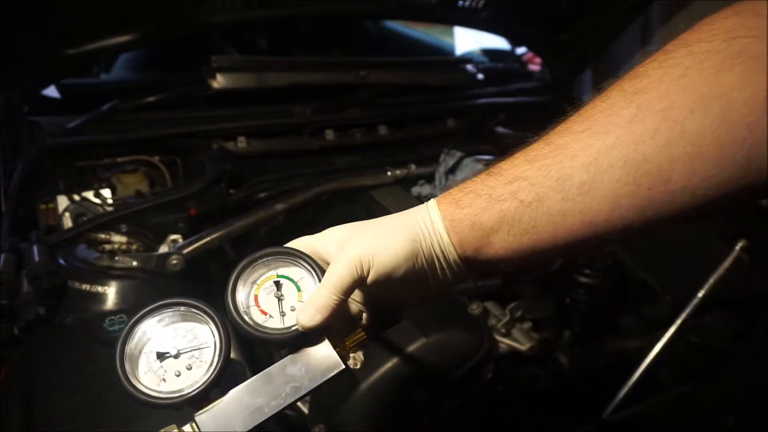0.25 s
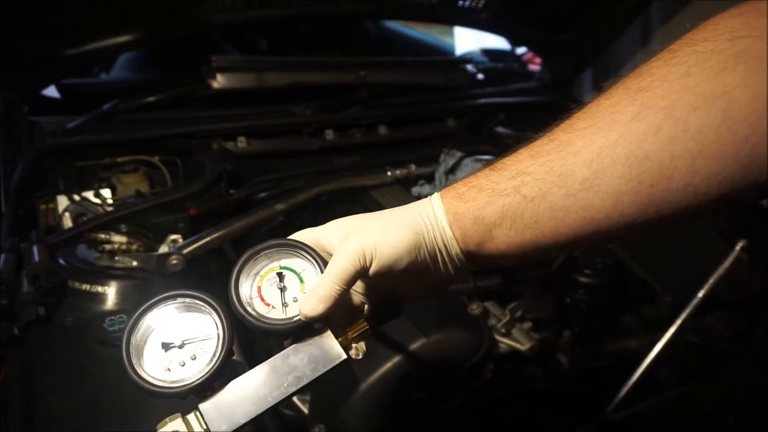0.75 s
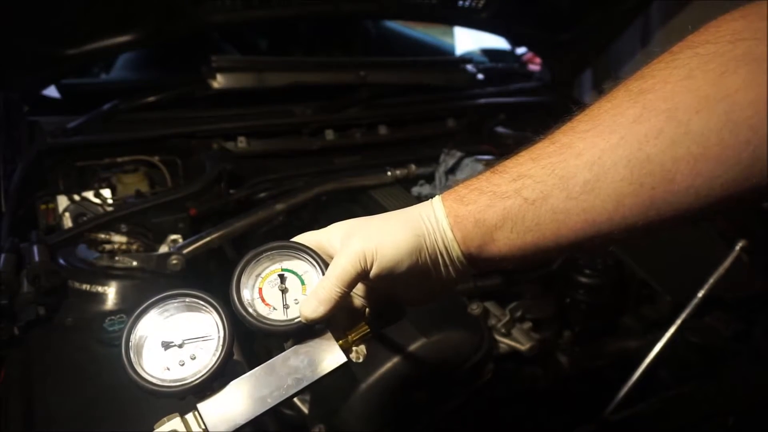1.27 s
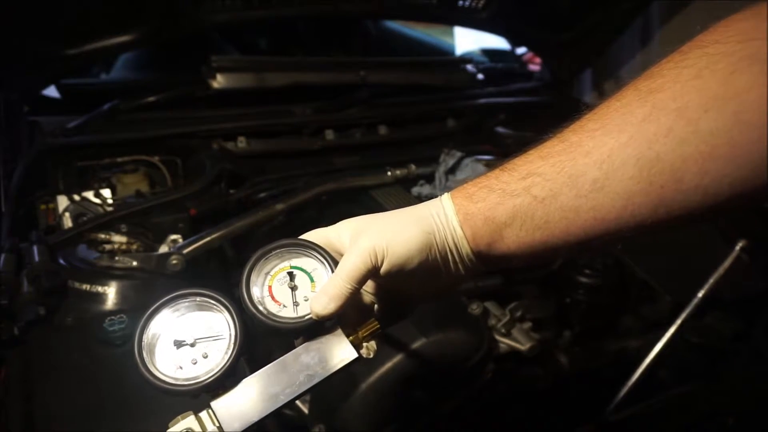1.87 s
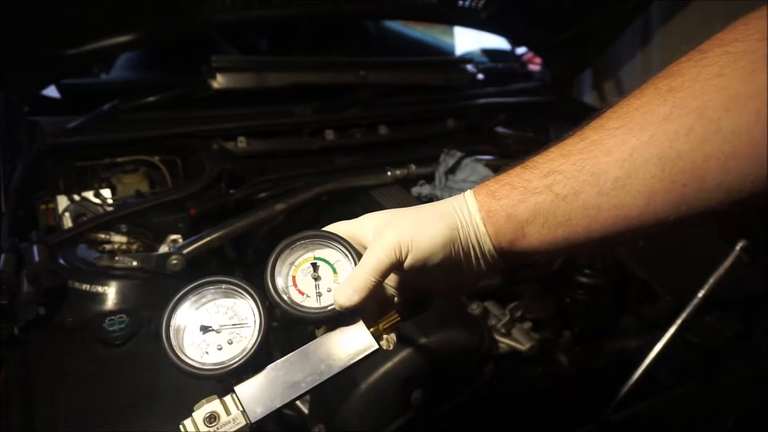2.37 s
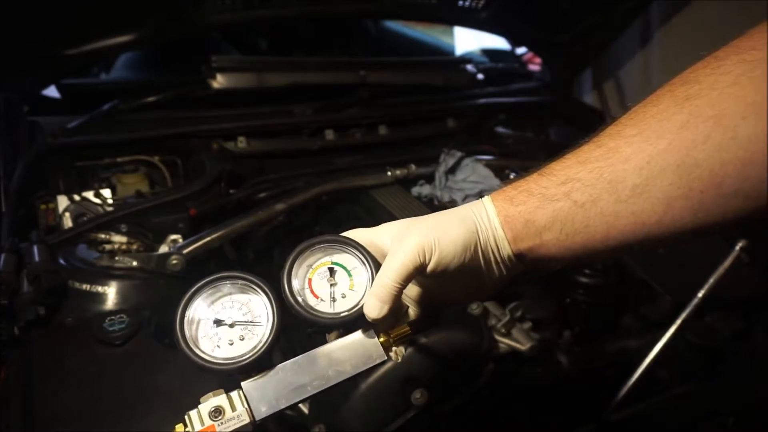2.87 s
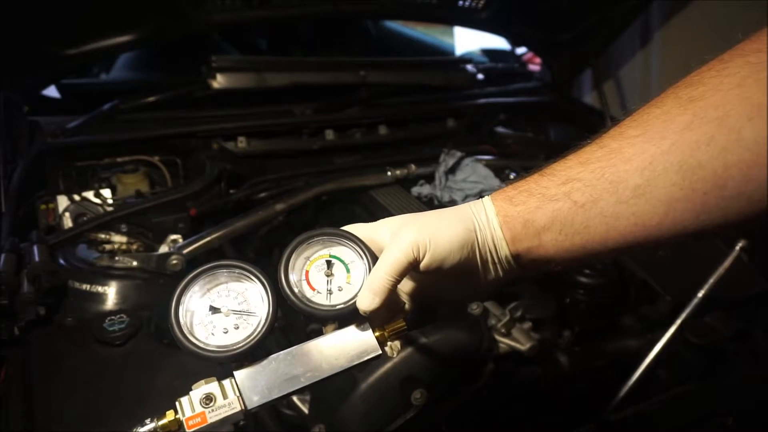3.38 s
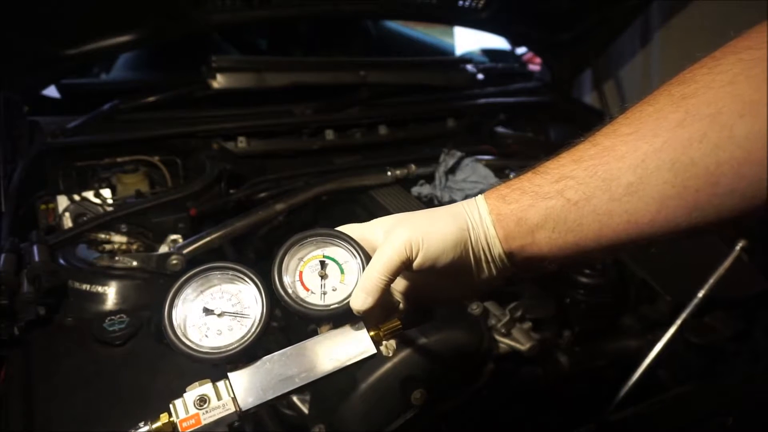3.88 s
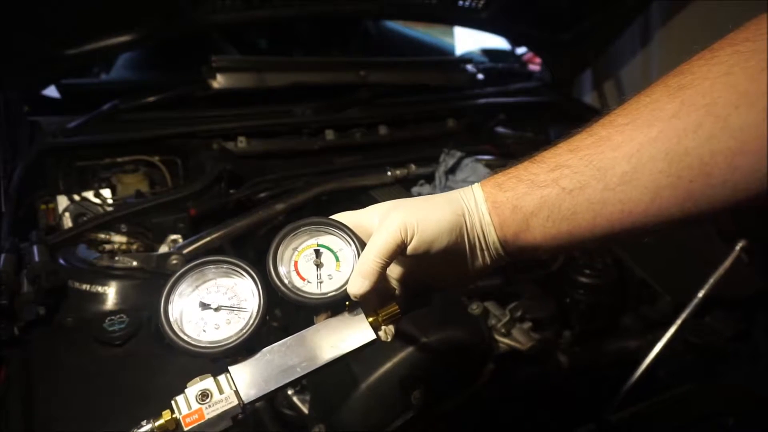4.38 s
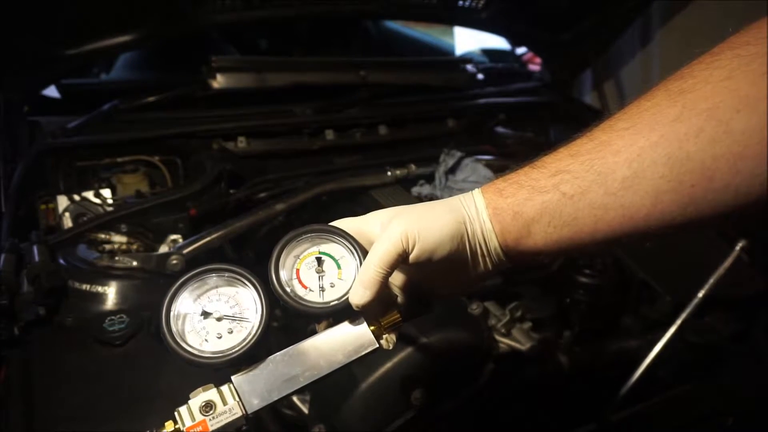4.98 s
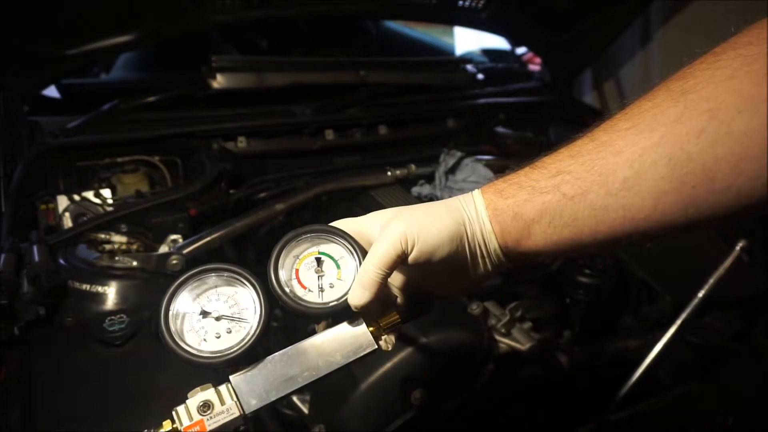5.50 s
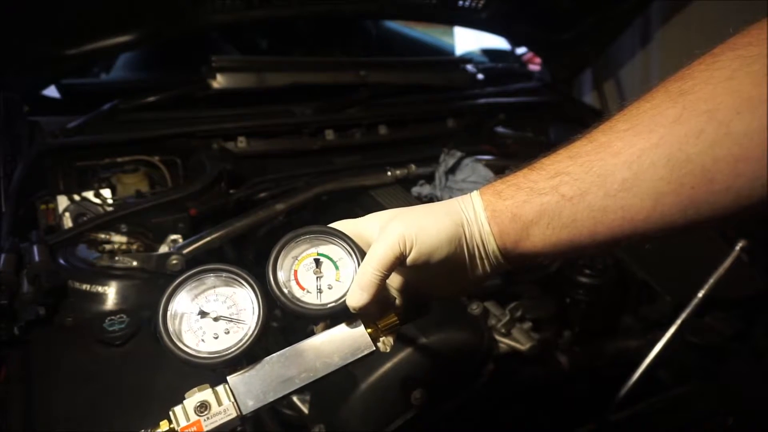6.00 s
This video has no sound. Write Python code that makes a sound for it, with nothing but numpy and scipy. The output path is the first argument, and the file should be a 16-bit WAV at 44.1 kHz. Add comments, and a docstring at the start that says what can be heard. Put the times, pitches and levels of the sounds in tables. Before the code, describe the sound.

From 0 to about 6 seconds an electric piston air compressor runs without pause, close up in a garage. About forty-seven strokes a second merge into a coarse, steady buzz, dominated by a hum near 380 hertz with a harder knock around 1.3 kilohertz. The speed sinks by a hair. Bright, dry valve ticks repeat every turn, with a tinny housing rattle and unsteady singing panels. Air roars in pulses and hisses broadly, slightly uneven, wide across left and right. Rattling is strongest near 0.2 with a ringing note around 3 kilohertz, swells again near 2.1, 3.55 and 4.1, and otherwise slowly settles. A thin whistle near 5.3 kilohertz flickers throughout, stronger at left, with brief flares near 0.8, 2.0, 3.7, 4.3, 4.8 and a cluster at 5.1 to 5.4, then again near 6.1. It is still running at the end.

```python
"""An electric piston air compressor runs in a garage, its crank slowing very slightly as pressure builds.
Sums of crank harmonics give the pump's throb and the cylinder's knock in each turn, and the singing panels.
Noise patterns repeating with the crank make the rattle, and decaying tones the ticks of the reed valves.
Shaped noise and narrow resonances make the rush of air; a thin whistle flickers and flares now and then."""
import sys
import numpy as np
from scipy import signal
from scipy.fft import rfft, irfft, next_fast_len
from scipy.io import wavfile
from scipy.ndimage import uniform_filter1d, map_coordinates

SR = 44100
rng = np.random.default_rng(int(sys.argv[2]) if len(sys.argv) > 2 else 0)


def to_wav(sig):
    """Store sig (one row per channel, or 1-D mono) as 16-bit WAV at the path in sys.argv[1].

    Samples outside -1..1 are clipped; the rate is SR.
    """
    pcm = np.clip(np.atleast_2d(sig), -1, 1) * 32767
    pcm = np.round(pcm).astype(np.int16)
    wavfile.write(sys.argv[1], SR, pcm.T)  # frames by channels


N = 275625  # samples

# Crank harmonics of the throb, of the knock and of the singing panels, with nominal levels:
# [multiple of crank speed, level/dB rms, left-right level/dB, left-right phase/half cycles]
THROB_HARMONICS = [(1, -36.7, 1, 0.04), (2, -31.4, 0, 0.04), (3, -42.8, 0, 0.09), (4, -37.5, 1, 0.07),
                   (5, -41.6, 0, 0.12), (6, -38.9, -1, 0.09), (7, -31.4, 1, 0.17), (8, -19.6, 1, 0.19),
                   (9, -42.8, 3, 0.13), (10, -36.7, -3, 0.4), (11, -39.7, 3, 0.24), (12, -58.2, 7, 0.62),
                   (13, -49.0, 1, 0.13), (14, -34.6, 1, 0.28), (15, -41.9, 13, 0.43), (16, -49.3, 4, 0.16),
                   (17, -41.3, 3, 0.25), (18, -29.3, -4, 0.05), (19, -36.7, 9, 0.74), (20, -41.8, 8, 0.13),
                   (21, -43.3, -4, 0.05), (22, -46.6, -1, 0.06)]
KNOCK_HARMONICS = [(25, -50.1, -1, 0.19), (26, -46.3, 2, 0.21), (27, -30.4, 1, 0.18), (28, -28.7, -3, 0.37),
                   (29, -31.2, -3, 0.06), (30, -37.9, -3, 0.49), (31, -41.2, 0, 0.51), (32, -41.6, 1, 0.64),
                   (33, -33.3, 5, 0.54), (34, -40.8, -9, 0.83), (35, -45.7, 0, 0.36), (36, -44.6, -1, 0.38)]
PANEL_HARMONICS = [(39, -45.3, -8, 0.65), (40, -48.0, 2, 0.5), (43, -47.1, -1, 0.57), (44, -43.6, 3, 0.63),
                   (45, -47.5, 5, 0.46), (57, -42.9, 4, 0.7), (64, -51.4, 3, 0.3), (65, -44.8, -1, 0.29),
                   (70, -41.0, -5, 0.87), (71, -46.7, 1, 0.77), (74, -45.7, 4, 0.56), (75, -45.5, 5, 0.64),
                   (77, -46.9, -5, 0.53), (79, -49.0, -5, 0.23), (85, -51.6, 2, 0.3), (105, -51.8, 6, 0.16)]
# Reed contacts in each turn: [crank position/turns, f/Hz, decay time/ms, nominal level/dB]
VALVE_CONTACTS = [(0.84, 15200, 1.04, -14.5), (.96, 15000, 1.6, -20), (.9, 13000, 1.6, -27.5),
                  (0.894, 9350, 4.6, -30), (0.073, 9200, 4.3, -32)]
# Loudest flares of the whistle: [t/s, nominal level/dB]
LOUD_FLARES = [(.452, -30), (.834, -24.5), (.906, -27), (1.306, -30), (1.981, -25), (3.694, -25),
               (4.304, -27), (4.775, -27), (5.096, -28), (5.231, -27), (5.428, -23.5), (6.147, -26)]
# Relative spectra of the roar, the hiss and the rattle: [f/Hz, density/dB per Hz]
ROAR_SPECTRUM = [(27, -6), (60, -7), (270, -8.5), (350, 1), (440, -4.5), (520, -2), (580, -12), (780, -12),
                 (880, -5.5), (980, -5), (1140, -10.5), (1350, 3.5), (1600, -6.5), (1900, -12.5)]
HISS_SPECTRUM = [(1900, -5), (2350, -4), (3400, -1), (4600, -2.5), (5700, -5), (6400, -3), (7500, -7.5),
                 (10500, -8), (12500, -7), (14000, -9), (15700, -3.5)]
RATTLE_SPECTRUM = [(1750, -4.5), (2400, -4.5), (3400, -4), (4300, -12), (5500, -2), (6400, -25),
                   (7600, -15), (8800, -8.5), (9300, 1), (10000, -19), (11000, -29)]
# Likeness of the two channels: [f/Hz, correlation]
CHANNEL_CORRELATION = [(100, .2), (350, 0.21), (620, 0.18), (850, 0.68), (1350, 0.29), (2000, 0.044),
                       (3400, -0.17), (6400, -0.44), (9000, -0.31), (13000, 0.13)]
# Narrow resonances of the tank and pipes, stirred by the air: [f/Hz, width/Hz, level/dB rms]
PIPE_RESONANCES = [(355, 17, -42), (403, 10, -46.5), (866, 30, -35.5)]
# Spells of harder rattling: [peak t/s, half length/s, added shake level/dB,
# multiple of crank speed that sings, level of that note/dB rms]
SPELLS = [(.18, .1, 2.8, 65, -38), (2.12, .16, 1.4, 44, -46), (3.55, .1, .5, 65, -42),
          (4.12, .05, 1.8, 57, -45)]

TOP_HZ = 15800  # upper limit of the band
START_HZ, SAG_HZ_PER_S = 47.328, 0.0157  # turns per second, and their loss each second
SHAKE_DB, SETTLE_DB_PER_S = 1.0, 0.17  # shake of the housing at the start, and its loss each second
TIME_S = np.arange(N) / SR
LEFT_RIGHT = np.array([[1], [-1]])


def amp(db):
    """Level definition: decibels to amplitude gain."""
    return 10 ** (np.asarray(db) / 20)


def unit(x):
    """Normalisation: a signal scaled to rms 1."""
    return x / np.sqrt(np.mean(x ** 2) + 1e-20)


def along(points, hz):
    """Logarithmic interpolation: (f/Hz, value) points read on a log frequency axis."""
    f, values = np.transpose(points)
    return np.interp(np.log(hz + 1), np.log(f + 1), values)


def band(points, hz):
    """Band limitation: a gain curve that falls away steeply beyond the ends of its spectrum."""
    below = np.minimum(hz / points[0][0], 1) ** 4
    above = np.minimum(points[-1][0] / (hz + 1), 1) ** 8
    return amp(along(points, hz)) * below * above


def wobble(rate, size=8):
    """Slow random modulation: a smooth curve through random knots, rate knots a second."""
    coarse = np.arange(0, N + size, size)
    knots = rng.standard_normal(int(N * rate / SR) + 4)
    curve = map_coordinates(knots, [coarse * rate / SR])
    return np.interp(np.arange(N), coarse, curve)


def swell(at_s, half_s):
    """Gaussian envelope: a smooth rise and fall of height 1."""
    return np.exp(-0.5 * np.minimum(((TIME_S - at_s) / half_s) ** 2, 20))


def filtered(x, response):
    """Linear filtering: the spectrum of x multiplied by a response of frequency."""
    m = next_fast_len(N + SR // 2)
    return irfft(rfft(x, m) * response(np.fft.rfftfreq(m, 1 / SR)), m)[..., :N]


def spread(pair, spectrum):
    """Partial coherence: two unrelated signals coloured and mixed to a stereo sound of rms 1."""
    def mid_side(hz):
        correlation = np.clip(along(CHANNEL_CORRELATION, hz), -1, 1)
        angle = np.arccos(correlation) / 2
        return band(spectrum, hz) * np.array([np.cos(angle), np.sin(angle)])

    mid, side = filtered(pair, mid_side)
    return unit(np.array([mid + side, mid - side]))


def narrow(hz, width_hz):
    """Narrow resonance: complex noise whose random envelope rides on one frequency."""
    return (wobble(width_hz) + 1j * wobble(width_hz)) * np.exp(2j * np.pi * hz * TIME_S)


def harmonic(turn, k, db, pan_db, width):
    """Standing waves in the garage set one crank multiple apart in level and phase at the two ears."""
    sides = LEFT_RIGHT / 2
    return np.sqrt(2) * amp(db + sides * pan_db) * np.cos(2 * np.pi * k * turn + sides * np.pi * width)


def stroke(crank, orders, smear, size=256):
    """Minimum phase: harmonics align to one sudden, ringing blow a turn; smear > 0 delays the higher ones."""
    k, db, pan_db, width = np.transpose(orders)
    log_gain = np.log(amp(np.interp(np.arange(size // 2 + 1), k, db)))
    cepstrum = irfft(log_gain)
    minimum_phase = 2 * rfft(cepstrum[:size // 2], size).imag[k.astype(int)]
    phase = minimum_phase - smear * (k - k.mean()) ** 2
    turn = np.linspace(0, 1, size ** 2 // 16 + 1)
    leads = phase / (2 * np.pi * k)
    shape = sum(harmonic(turn + lead, *row) for lead, row in zip(leads, orders))
    return np.array([np.interp(crank % 1, turn, ear) for ear in shape])


def surge(crank, at, depth_db):
    """Periodic modulation: a gain that swells once in every turn, peaking at a crank position."""
    return unit(amp(depth_db * np.cos(2 * np.pi * (crank - at))))


def patchy(x, depth_db):
    """Turbulence: patches of time and frequency swell and fade on their own."""
    z = signal.stft(x, nperseg=512)[2]
    across_frequency = uniform_filter1d(rng.standard_normal(z.shape[1:]), 5, 0)
    field = uniform_filter1d(across_frequency, 12, 1)
    return signal.istft(z * amp(depth_db * unit(field)), nperseg=512)[1][:, :N]


def speed():
    """Motor loading: rising tank pressure slows the crank evenly, in turns per second."""
    return START_HZ - SAG_HZ_PER_S * TIME_S


def shake_db():
    """Forced vibration: the housing's shake settles slowly, with a few spells of harder rattling."""
    settling = SHAKE_DB - SETTLE_DB_PER_S * TIME_S
    return settling + sum(db * swell(s, half_s) for s, half_s, db, *_ in SPELLS)


def air(crank):
    """Flow noise: air roars in step with the crank, hums in resonant pipes and hisses in turbulence."""
    roar_noise = rng.standard_normal((2, N)) * surge(crank, at=0.024, depth_db=2.7)
    roar = spread(roar_noise, ROAR_SPECTRUM)
    hum = sum(amp(db) * narrow(hz, width_hz).real for hz, width_hz, db in PIPE_RESONANCES)
    turbulence = patchy(rng.standard_normal((2, N)), depth_db=1.22)
    hiss = spread(turbulence * surge(crank, at=0.12, depth_db=0.38), HISS_SPECTRUM)
    flutter_db = 0.5 * wobble(25) + 0.16 * shake_db()
    hiss_db = -26.0 + flutter_db + 0.5 * LEFT_RIGHT
    return amp(-27.5) * roar + hum + amp(hiss_db) * hiss


def whistle(pitch_hz=5340, steady_db=-40.5, flare_s=0.01, flicker_db=2.5,
            small_db=-32.0, scatter_db=4.0, count=10):
    """Resonant air tone: a flickering narrow band that catches briefly, often faintly, now and then loudly."""
    small = [(u * N / SR, small_db + scatter_db * (2 * v - 1)) for u, v in rng.random((count, 2))]
    flares = np.max([amp(db) * swell(s, flare_s) for s, db in LOUD_FLARES + small], axis=0)
    caught = flares * np.exp(2j * np.pi * pitch_hz * TIME_S + 1j * wobble(60))
    flickering = amp(steady_db + flicker_db * wobble(30)) * narrow(pitch_hz, 80)
    tone = caught + flickering
    return np.array([1.53 * tone.real, (tone * np.exp(-1.4j)).real])  # stronger at left, shifted at right


def ring(crank, drift_db=2.5, flutter_db=3.5, follow=1.73):
    """Resonance: panels near a crank harmonic sing unsteadily with the shake; each spell brings one out."""
    shaking = amp(follow * shake_db() - 2.5)
    notes = np.zeros((2, N))
    for k, db, pan_db, width in PANEL_HARMONICS:
        sung = sum(amp(sung_db) * swell(s, half_s)
                   for s, half_s, _, multiple, sung_db in SPELLS if multiple == k)
        waver_db = drift_db * wobble(2.39) + flutter_db * wobble(22.11)
        level = np.hypot(shaking * amp(db + waver_db), sung)
        notes += level * harmonic(crank + rng.random(), k, 0, pan_db, width)
    return notes


def rattle(crank, size=1024, count=4):
    """Cyclic impacts: the housing clatters alike from turn to turn, its pattern changing only slowly."""
    patterns = rng.standard_normal((count, 2, size))
    weights = np.array([wobble(0.563) for _ in patterns])
    weights /= np.linalg.norm(weights, axis=0)
    place = (crank + 0.00033 * wobble(45)) % 1 * size  # slight jitter in timing
    clatter = np.zeros((2, N))
    for weight, pattern in zip(weights, patterns):
        played = [map_coordinates(ear, [place], mode="grid-wrap") for ear in pattern]
        clatter += weight * np.array(played)
    return amp(-36.0 + 0.37 * shake_db()) * spread(clatter, RATTLE_SPECTRUM)


def valves(crank, rise_ms=0.28, blur=1.0, uneven_db=1.8, left_db=1.5):
    """Damped vibration: steel reeds slap stops and seats, ringing briefly at a new strength each turn."""
    out = np.zeros((2, N))
    for at, hz, decay_ms, db in VALVE_CONTACTS:
        turns, part = np.divmod(crank - at + 1, 1)
        ms = part / speed() * 1000  # time since contact
        strengths_db = db + uneven_db * rng.standard_normal(N // 100)
        force = amp(strengths_db[turns.astype(int)])
        envelope = (1 - np.exp(-ms / rise_ms)) * np.exp(-ms / decay_ms)
        shared_blur = 2 * blur * wobble(350)
        ear_blur = 0.89 * np.array([wobble(600), wobble(600)])
        out += force * envelope * np.sin(2 * np.pi * hz * TIME_S + shared_blur + ear_blur)
    return out * amp(left_db * LEFT_RIGHT)


def pump(crank):
    """Periodic excitation: a nearly even intake throb, then a knock varying in force and timing."""
    throb = stroke(crank - 0.2, THROB_HARMONICS, smear=-0.02)
    slack = 0.00044 * wobble(40)  # turns
    knock = stroke(crank - 0.55 + slack, KNOCK_HARMONICS, smear=0.26)
    throb_db = -0.22 + 0.39 * wobble(14)
    knock_db = -0.63 + 0.73 * wobble(25)
    return amp(throb_db) * throb + amp(knock_db) * knock


def scene():
    """Superposition: one crank angle times the machine's parts, and the whistle is added."""
    crank = np.cumsum(speed() + 0.0173 * wobble(9)) / SR  # turns, at a slightly unsteady speed
    return air(crank) + whistle() + ring(crank) + rattle(crank) + valves(crank) + pump(crank)


def record(dry):
    """Low-pass filtering: nothing remains above the band limit."""
    return filtered(dry, lambda hz: hz < TOP_HZ)


dry = scene()
out = record(dry)
to_wav(out)
```